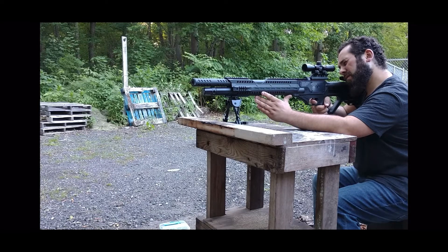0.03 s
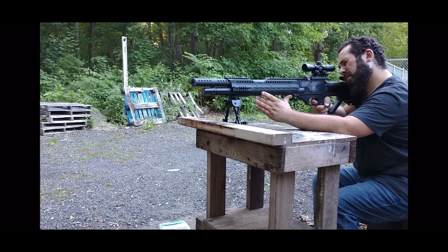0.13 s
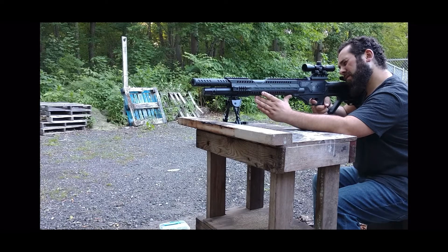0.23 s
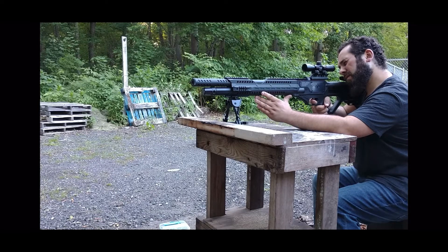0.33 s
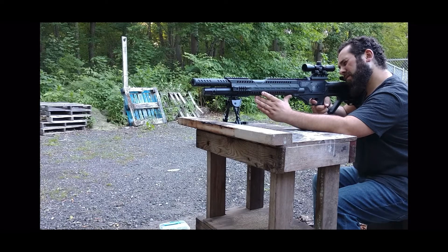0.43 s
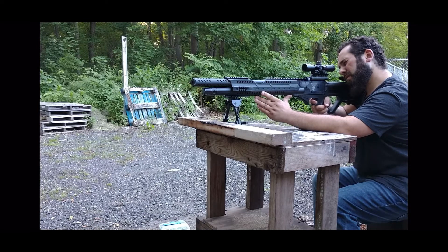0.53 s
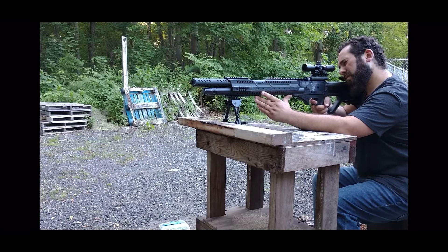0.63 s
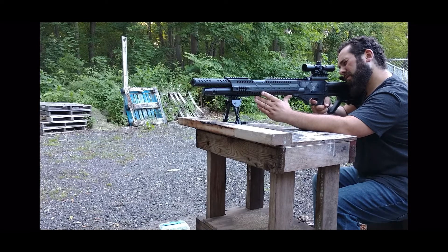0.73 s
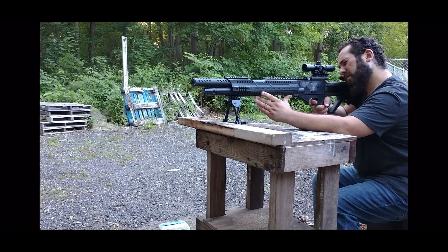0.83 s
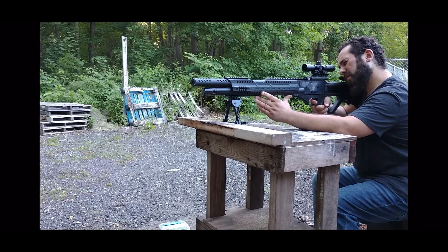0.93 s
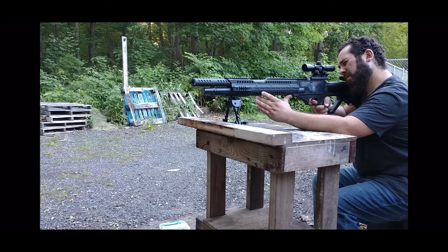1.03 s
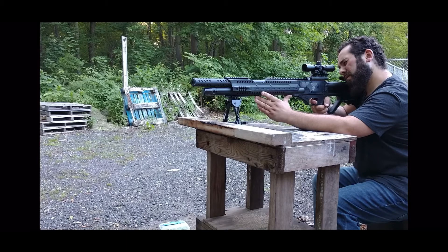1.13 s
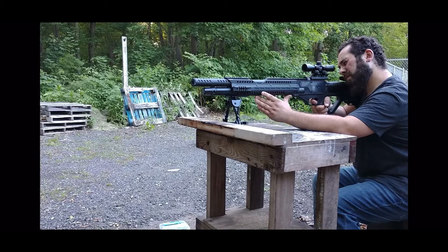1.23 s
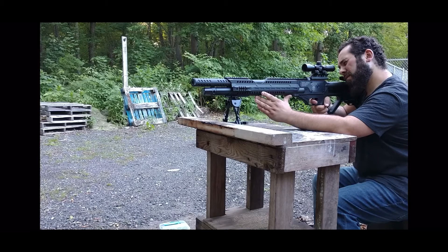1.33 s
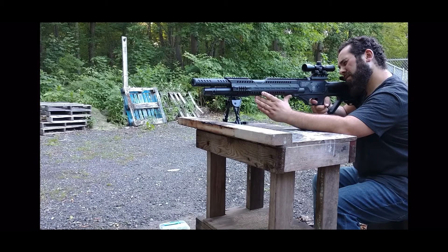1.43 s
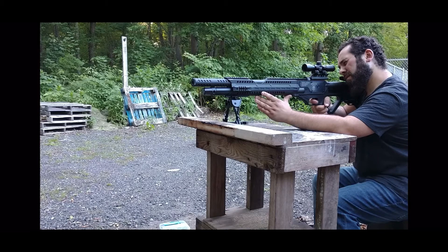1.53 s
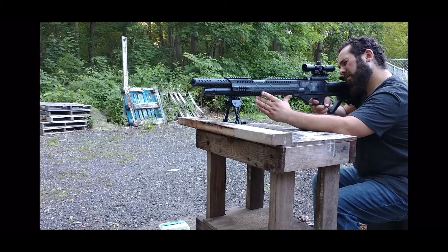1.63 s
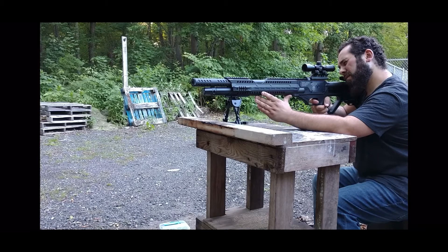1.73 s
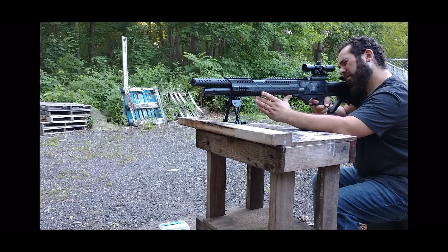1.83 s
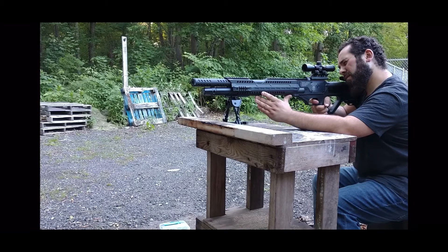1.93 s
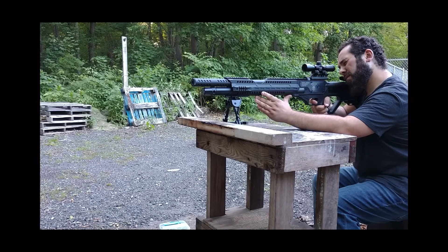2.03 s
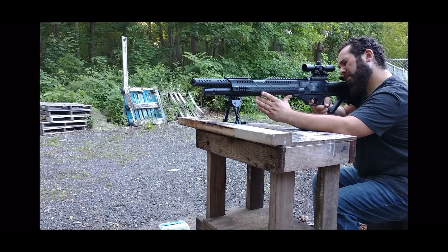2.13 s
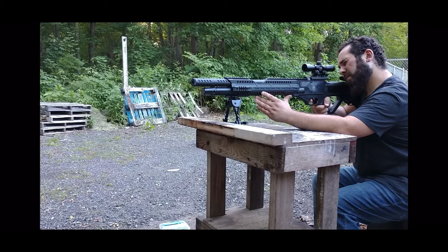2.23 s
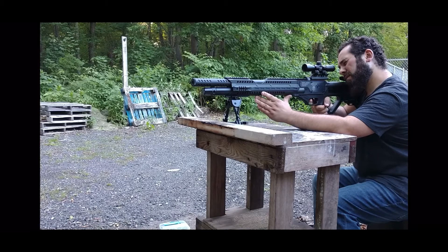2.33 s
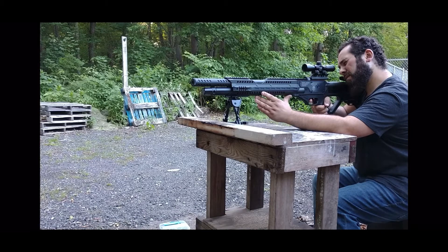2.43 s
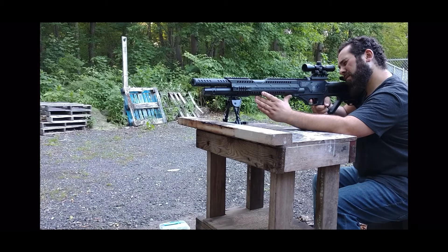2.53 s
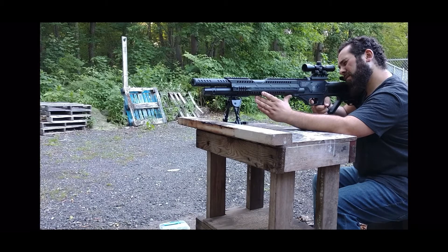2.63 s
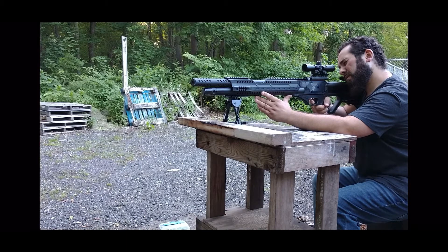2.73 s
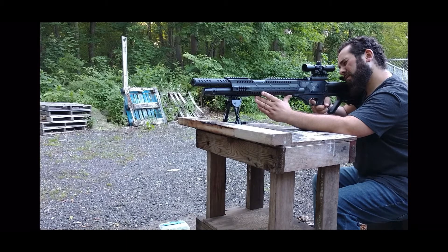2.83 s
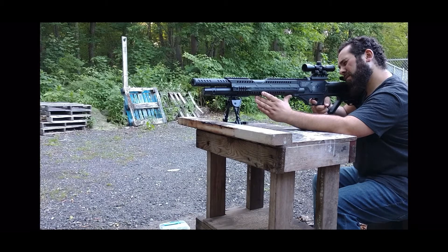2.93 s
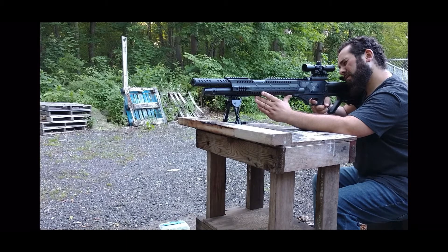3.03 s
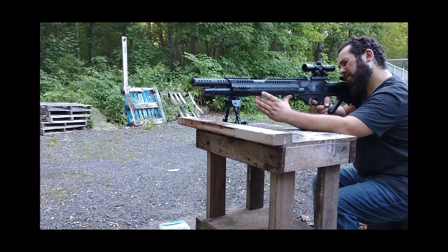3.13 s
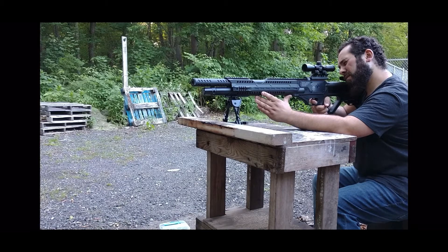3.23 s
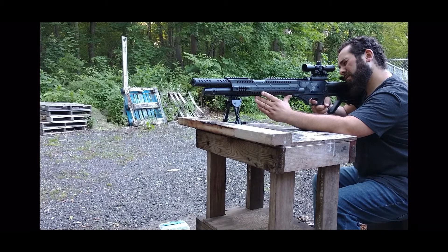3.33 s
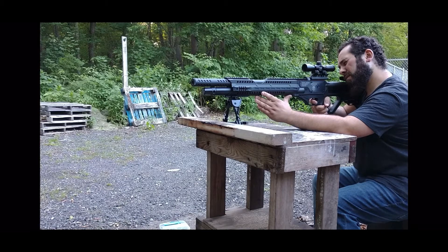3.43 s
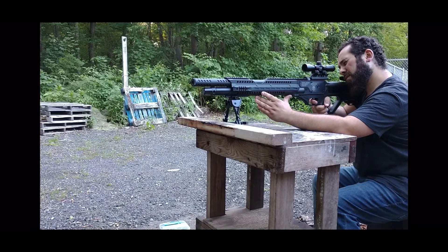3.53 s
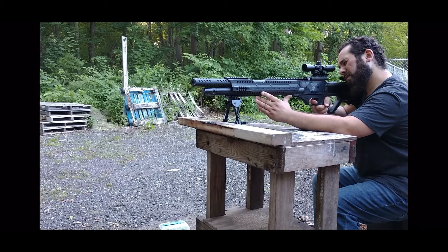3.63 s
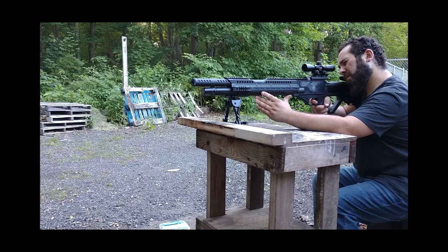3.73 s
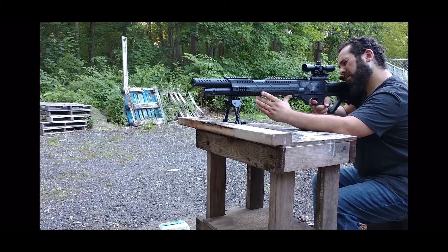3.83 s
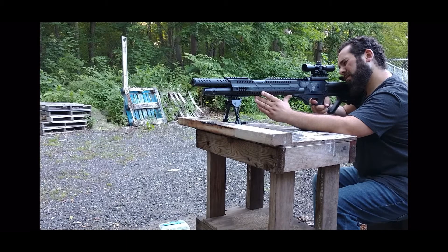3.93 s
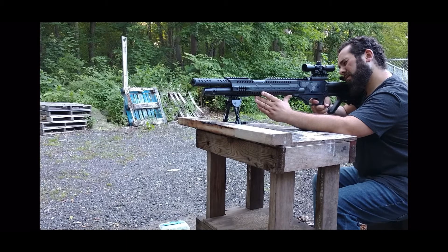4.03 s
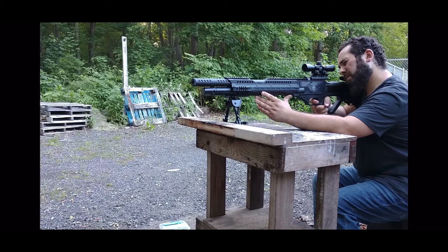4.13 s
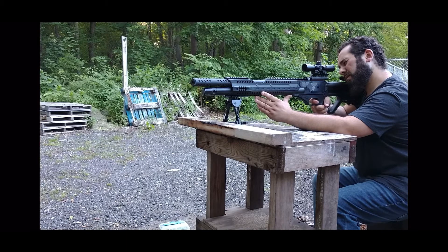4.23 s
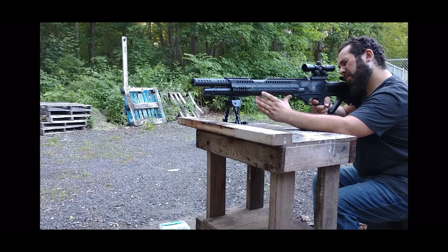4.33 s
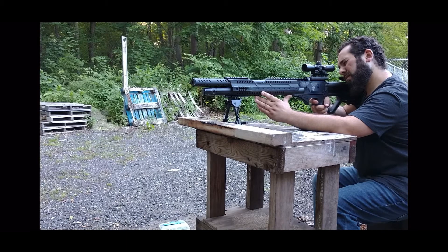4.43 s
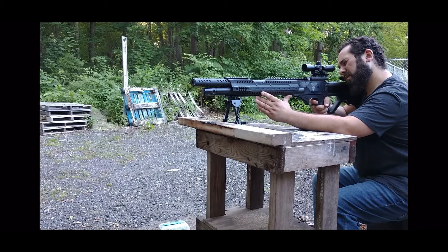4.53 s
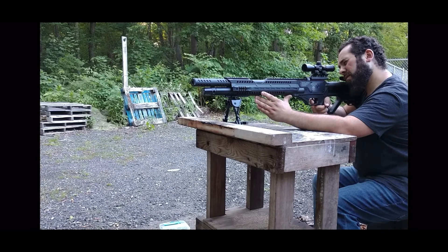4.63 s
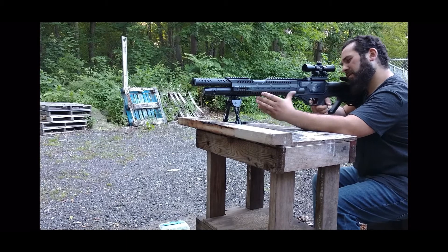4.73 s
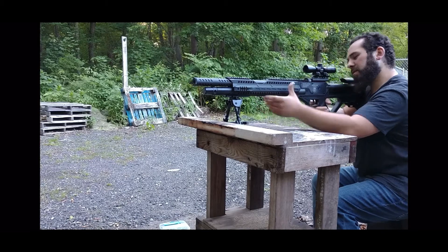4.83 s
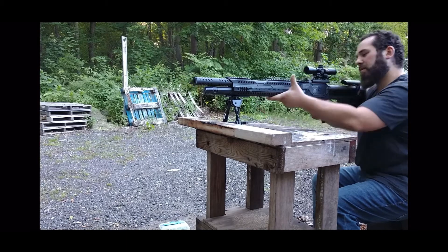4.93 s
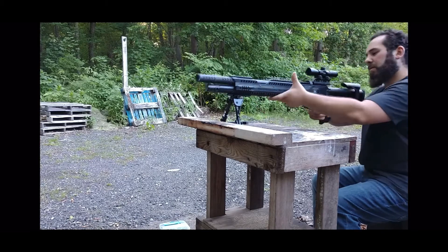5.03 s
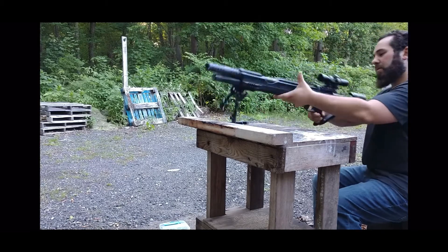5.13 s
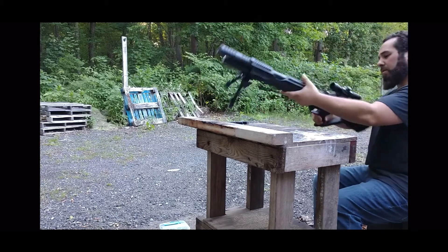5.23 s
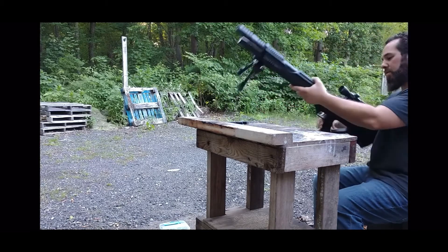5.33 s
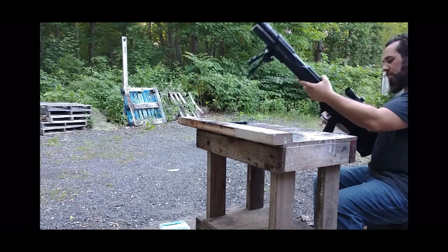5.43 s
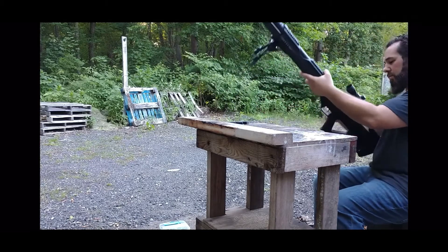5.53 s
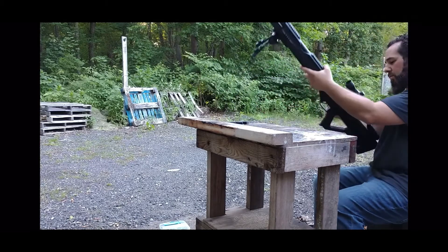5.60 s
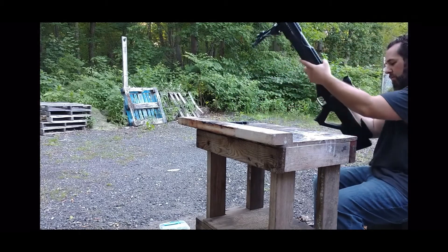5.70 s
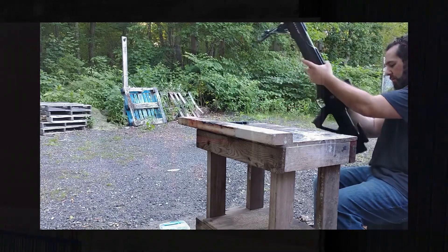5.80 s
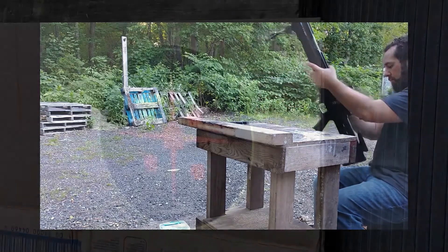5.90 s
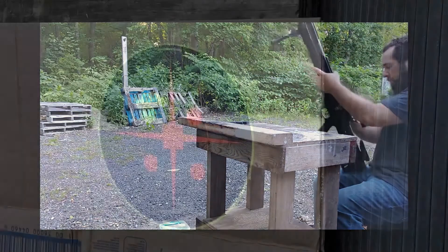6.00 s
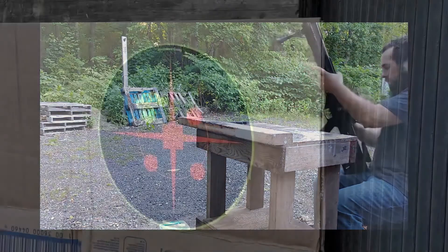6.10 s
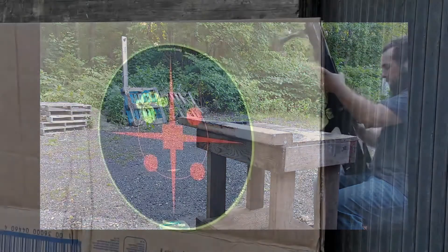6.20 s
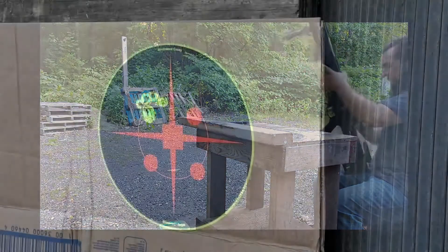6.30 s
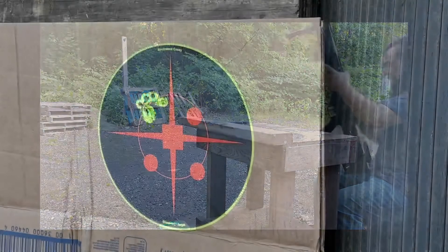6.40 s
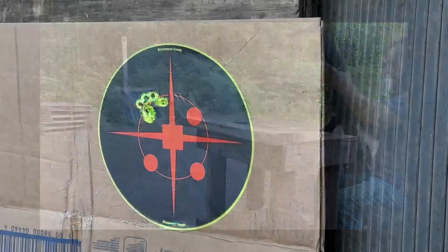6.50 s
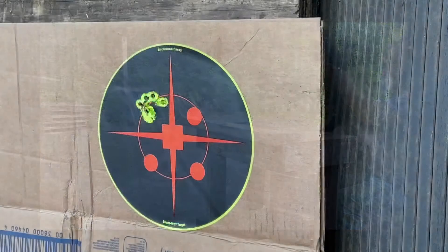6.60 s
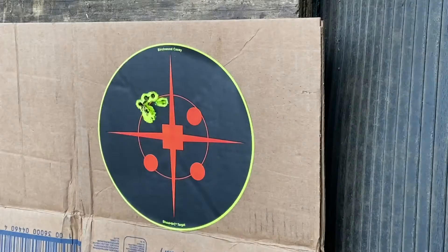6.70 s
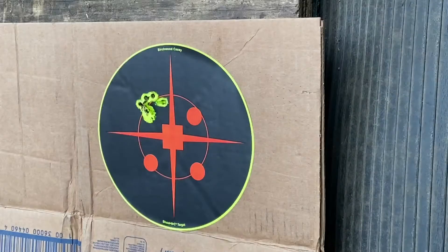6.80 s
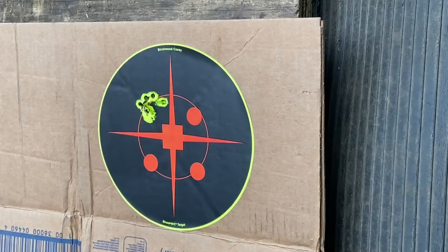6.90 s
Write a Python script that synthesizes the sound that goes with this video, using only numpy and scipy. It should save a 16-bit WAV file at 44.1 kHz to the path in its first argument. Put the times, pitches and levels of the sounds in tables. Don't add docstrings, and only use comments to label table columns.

```python
import sys
import numpy as np
from scipy import signal
from scipy.fft import rfft, irfft, next_fast_len
from scipy.io import wavfile
from scipy.ndimage import uniform_filter1d

SR = 44100
rng = np.random.default_rng(int(sys.argv[2]) if len(sys.argv) > 2 else 0)


def undo_db(level):
    steps = np.asarray(level, float) / 20
    return 10 ** steps


def transcribe(u):
    v = np.clip(np.atleast_2d(u).T, -1, 1)
    q = np.round(v * 32767).astype(np.int16)
    wavfile.write(sys.argv[1], SR, q)


N = 306936
M = next_fast_len(N)
HZ = np.maximum(np.arange(M // 2 + 1) * SR / M, 1)
T = np.arange(N) / SR
PORT_S = .000462
LEAD_S = .015

# blast_s, level_db, wall_echo_delay_s, wall_echo_db
SHOTS = [
    (1.6117, 2, .0423, 3),
    (4.0353, 0.57, .0465, -1.75),
]
# freq_hz, density_db
HISS = [(500, -5.5), (1500, 11.5), (2500, 9), (4000, 2.5), (6500, -2), (8500, -12.5), (11000, -4),
        (15500, -2.5), (16200, -32)]


def shape(table):
    hz, db = np.transpose(table)
    return undo_db(np.interp(np.log(HZ), np.log(hz), db))


def band(x, hz, width_hz):
    edges_hz = np.clip([hz - width_hz / 2, hz + width_hz / 2], 20, .45 * SR)
    y = signal.sosfilt(signal.butter(2, edges_hz, "bandpass", fs=SR, output="sos"), x)
    return y / y.std()


def walk(rate_hz):
    k = int(SR / rate_hz)
    held = rng.standard_normal(size=500)[np.arange(N) // k]
    w = uniform_filter1d(uniform_filter1d(held, k), k)
    return w / w.std()


def arch(progress):
    return np.sqrt(np.sin(np.pi * np.clip(progress, 0, 1)) + 1e-9)


def fall(t, t60):
    return 1000. ** (-t / t60)


def add(out, x, s):
    i = int(s * SR)
    out[:, i:i + x.shape[1]] += x[:, :N - i]


def diffuse(gain):
    mid, side = (rfft(rng.standard_normal(M)) * gain for _ in range(2))
    like = np.sinc(2 * HZ * PORT_S)
    common = np.sqrt((1 + like) / 2) * mid
    opposed = np.sqrt((1 - like) / 2) * side
    pair = irfft(np.array([common + opposed, common - opposed]), M)[:, :N]
    return pair / pair.std()


def fade():
    # start_s, end_s
    cut_s = (6.15, 6.72)
    return np.interp(T, cut_s, [1, 0]) ** 0.95


def gain_db():
    duck_db, hold_s, recover_db_per_s, smooth_s = -25, 0.4, 11.5, .03
    earlier_shot_s = -1.523
    blasts_s = np.array([earlier_shot_s] + [s for s, *_ in SHOTS])
    since_s = T - blasts_s[np.searchsorted(blasts_s, T) - 1]
    climb_db = np.clip(duck_db + recover_db_per_s * (since_s - hold_s), duck_db, 0)
    k = int(smooth_s * SR)
    return uniform_filter1d(climb_db, k, origin=k // 2 - 1)


def next_air():
    # freq_hz, density_db
    air_spectrum = [(25, -8), (70, 4), (150, -20), (300, -24), (800, -25), (2000, -27), (5000, -54),
                    (9000, -76)]
    # start_s, end_s
    fade_in_s = (6.2, 6.7)
    return diffuse(shape(air_spectrum)) * undo_db(-65.5) * np.interp(T, fade_in_s, [0, 1])


def whine():
    # time_s, pitch_hz
    glide = [(4.3, 298), (5.0, 322), (5.6, 333.7), (5.9, 320), (6.2, 300.5), (7.2, 290)]
    level_db, wander_db = -8, 1.5
    s, hz = np.transpose(glide)
    swell = arch((T - s[0]) / (s[-1] - s[0]))
    phase = 2 * np.pi * np.cumsum(np.interp(T, s, hz) * (1 + .012 * walk(12))) / SR
    return swell * undo_db(level_db + wander_db * walk(11)) * np.sin(phase)


def traffic():
    # freq_hz, density_db
    road_spectrum = [(25, -27), (55, -16.5), (100, -1), (200, -7), (350, -4.5), (600, -4), (1000, -7.5),
                     (1500, -14.5), (2200, -21.5), (4000, -43), (9000, -73.5)]
    # start_s, end_s, centre_hz, width_hz, level_db under the traffic
    passing = [(.8, 1.75, 600, 36, -7)]
    out = diffuse(shape(road_spectrum)) * undo_db(0.36 * walk(9.1))
    for start_s, end_s, hz, width_hz, db in passing:
        swell = arch((T - start_s) / (end_s - start_s))
        out = out + undo_db(db) * swell * band(diffuse(1), hz, width_hz)
    return out + whine()


def engine(ride_db):
    # multiple, level_db
    multiples = [(2, 0.5), (3, -4), (4, -9), (6, -12)]
    # time_s, level_db
    load = [(0, -21), (.7, -15), (1.2, -1.5), (2.0, -5.5), (2.4, 3), (3.3, 1.1), (4.0, -0.5), (4.3, -6),
            (4.9, 3), (5.2, 2.5), (5.44, 10.5), (5.8, 0.1), (6.25, -1), (6.4, -7)]
    rate_hz, level_db, throb_db = 46.56, -48.5, 1.5
    lead_rad = .03
    throb_level_db = level_db + ride_db + np.interp(T, *np.transpose(load)) + throb_db * walk(14)
    phase = 2 * np.pi * np.cumsum(rate_hz * (1 + 0.0082 * walk(2.5))) / SR
    tone = sum(undo_db(db + 1.4 * walk(8)) * np.sin(k * phase + np.array([[lead_rad * k], [0]]))
               for k, db in multiples)
    return tone * undo_db(throb_level_db)


def background(ride_db):
    # time_s, level_db
    slow_swell = [(0, 0.3), (1.5, 0.4), (3.9, 1.45), (4.7, 2), (5.44, 2.5), (5.9, -0.5), (6.2, -5), (6.9, -6)]
    traffic_db, leaves_db, circuit_db, flicker_db = -41.5, -60.5, -71, .8
    swelled_db = ride_db + np.interp(T, *np.transpose(slow_swell))
    hiss_gain = np.hypot(undo_db(leaves_db + swelled_db), undo_db(circuit_db)) * undo_db(flicker_db * walk(15))
    hiss = diffuse(shape(HISS)) * hiss_gain
    return (traffic() * undo_db(traffic_db + swelled_db) + engine(ride_db) + hiss) * fade()


def birds():
    # start_s, length_s, level_db at full gain
    whistler = [(1.218, 0.056, -55), (2.833, .1, -53), (3.92, .1, -58.5), (4.833, 0.08, -58),
                (5.818, 0.081, -55), (5.948, .04, -68), (6.841, 0.11, -78.5)]
    chip = [(1.27, 0.028, -54.5), (2.887, .021, -51), (5.88, 0.014, -53.5)]
    lisper = [(0.184, .15, -59.5), (0.774, 0.13, -69), (2.55, .1, -64.5), (6.492, .075, -96.5)]
    piper = [(.105, 0.065, -56.5), (1.537, .08, -70.5)]
    voices = (((4080, 4050, 42), whistler), ((2720, 2650, 150), chip),  # start_hz, end_hz, width_hz
              ((7740, 7620, 130), lisper), ((6090, 6060, 60), piper))
    echo_db, echo_t60_s = -8, .9
    clean = .45
    out = np.zeros((2, N))
    t = np.arange(SR // 2) / SR
    for (start_hz, end_hz, width_hz), notes in voices:
        for start_s, length_s, db in notes:
            note = arch(t / length_s)
            echo = undo_db(echo_db) * fall(t, echo_t60_s) * np.clip(t / length_s, 0, 1)
            waver = band(rng.standard_normal(size=(4, len(t))), width_hz / 2 + 20, width_hz)
            scatter = waver[:2] + 1j * waver[2:]
            hz = np.interp(t, [0, length_s], [start_hz, end_hz])
            tone = np.exp(2j * np.pi * np.cumsum(hz) / SR)
            envelope = clean * note + ((1 - clean) * note + echo) * scatter
            add(out, undo_db(db) * np.real(tone * envelope), start_s)
    return out


def burst(db, hz, width_hz, rise_ms, t60_ms, like, grain_db=4.5):
    ms = np.arange(6000) / SR * 1000
    common, a, b, size = rng.standard_normal(size=(4, len(ms)))
    like = np.clip(like, 0, 1)
    pair = np.sqrt(like) * common + np.sqrt(1 - like) * np.array([a, b])
    pair = pair * undo_db(grain_db * size)
    rise = 1 - np.exp(-(ms / rise_ms) ** 2)
    return band(pair, hz, width_hz) * undo_db(db) * fall(ms, t60_ms) * rise


def strike(thing, db=0):
    rise_ms, like, parts = thing
    return sum(burst(db + part_db, hz, width_hz, rise_ms, t60_ms, like)
               for hz, width_hz, part_db, t60_ms in parts)


def handling():
    # (centre_hz, width_hz, level_db, t60_ms)
    trigger = (0.87, 0.27, [(1210, 1500, -48.5, 30), (4500, 4100, -43.5, 28), (13900, 5000, -57, 28)])
    knock = (2.5, 0.39, [(960, 1680, -35, 47), (4090, 7400, -37, 32.5), (13600, 8000, -46, 31)])
    thud = (1.7, .4, [(900, 490, -43, 29), (4000, 5000, -62, 24)])
    # start_s, level_db
    resets = [
        (2.1161, -1),
        (4.630, 1),
    ]
    # start_s, level_db
    knocks = [
        (5.002, -23),
        (5.629, -29),
        (6.08, 1.2),
    ]
    # start_s, level_db
    thuds = [(6.303, -4)]
    again_s, again_db = 0.0032, -7
    second_clicks = [(s + again_s, db + again_db) for s, db in resets]
    out = np.zeros((2, N))
    for thing, rows in ((trigger, resets + second_clicks), (knock, knocks), (thud, thuds)):
        for s, db in rows:
            add(out, strike(thing, db), s)
    return out


def yard():
    # centre_hz, level_db, t60_s
    reverb = [(298, -53, 0.33), (730, -51.5, 0.91), (1490, -49, 0.65), (3220, -48.5, 0.99),
              (5400, -47.5, 0.83), (8000, -52.5, 0.33), (12550, -46, 0.62)]
    t = np.arange(SR) / SR
    air = diffuse(1)[:, :SR]
    tail = sum(band(air, hz, 0.67 * hz) * undo_db(db) * fall(t, t60_s) for hz, db, t60_s in reverb)
    return tail * (1 - np.exp(-t / .008))


def muzzle_blast(t):
    # freq_hz, level_db, t60_ms
    modes = [(900, -4, 2.6), (2500, -11, 3.0), (3400, -5.5, 3.6), (4500, -8, 3.0), (5700, -9, 2.6),
             (7400, -11, 2.4), (11800, -9, 3.0)]
    lag_s, far_db = .00002, -2
    port_t = np.maximum(t - np.array([[0], [lag_s]]), 0)
    ring = sum(undo_db(db) * fall(port_t, t60_ms / 1000) * np.sin(2 * np.pi * hz * port_t)
               for hz, db, t60_ms in modes)
    ring = signal.sosfilt(signal.butter(2, 270, "highpass", fs=SR, output="sos"), ring)
    return ring * undo_db([[0], [far_db]])


def target_box(t):
    # freq_hz, level_db, t60_s
    modes = [(312, -10.5, 0.12), (539, -1.2, 0.058), (676.5, -8.5, 0.087), (920, -8, 0.045)]
    boom = sum(undo_db(-33 + db) * fall(t, t60_s) * np.sin(2 * np.pi * hz * t) for hz, db, t60_s in modes)
    rise_s = .0015
    return np.tile(boom * (1 - np.exp(-t / rise_s)), (2, 1))


def shot(echo_s, echo_db):
    # (centre_hz, width_hz, level_db, t60_ms)
    sear = (3.7, .7, [(5100, 4000, -27.5, 21)])
    hammer = (.8, .3, [(1360, 3000, -21, 46), (4000, 3400, -15, 16), (12400, 5000, -22.5, 19)])
    jet = (.3, 0.27, [(4500, 7200, -15.5, 8)])
    shroud = (.7, 0.75, [(450, 340, -21, 55), (1090, 1200, -24.5, 60), (4500, 5000, -23.5, 36),
              (12700, 5000, -18, 30)])
    stock = (1.4, .4, [(5100, 6000, -42, 70)])
    bench = (1.7, .6, [(3160, 2200, -33, 46)])
    wall = (.9, .4, [(1000, 1700, -42.5, 63), (5000, 6000, -42.5, 84), (13000, 5000, -46, 61)])
    shed = (2.7, 0.36, [(490, 280, -42, 32)])
    pellet = (.3, 0.13, [(1760, 1940, -44.5, 130), (4860, 5700, -42, 41), (12000, 7000, -45.5, 50)])
    cardboard = (1.2, 0.66, [(715, 560, -43, 66), (320, 166, -47, 103)])
    # freq_hz, level_db, t60_ms, delay_s
    pressure_swing = (118, -31.5, 55, .0052)
    sequence = [(-.0100, sear), (-.0073, hammer), (-.0004, jet), (.0011, shroud),
                (.0058, stock), (.016, bench), (.092, shed), (.1179, pellet), (.1245, cardboard)]
    t = np.arange(SR // 2) / SR
    out = np.zeros((2, SR))
    for s, thing in sequence:
        add(out, strike(thing), LEAD_S + s)
    add(out, strike(wall, echo_db), LEAD_S + echo_s)
    add(out, muzzle_blast(t), LEAD_S)
    hz, db, t60_ms, delay_s = pressure_swing
    swing = undo_db(db) * fall(t, t60_ms / 1000) * np.sin(2 * np.pi * hz * t)
    add(out, swing * np.array([[1], [-1]]), LEAD_S + delay_s)
    add(out, target_box(t), LEAD_S + .1195)
    return out


def scene():
    ride_db = gain_db()
    out = background(ride_db) + next_air() + birds() * undo_db(ride_db) + handling()
    for s, db, *echo in SHOTS:
        add(out, yard() * undo_db(db), s)
        add(out, shot(*echo) * undo_db(db), s - LEAD_S)
    return out


def low_pass(x):
    return signal.sosfilt(signal.butter(12, 16970, fs=SR, output="sos"), x)


def record(dry):
    # freq_hz, level_db
    right_colour = [(60, -4), (200, -4), (700, -3), (1500, 0), (9500, 1.5), (12000, -13.5), (16000, -16.5)]
    beam = .9
    notch_hz, notch_width_hz, notch_db = 9560, 240, -19.5
    top_hz, clip_level, self_db = 15950, .96, -79
    a, b = rfft(dry, M)
    late = beam * np.exp(-2j * np.pi * HZ * PORT_S)
    makeup = (1 + beam ** 2 - 2 * np.sinc(2 * HZ * PORT_S) * late.real) ** -.5
    colour = makeup * undo_db(notch_db / (1 + ((HZ - notch_hz) / notch_width_hz) ** 2))
    colour = colour / np.sqrt(1 + (HZ / top_hz) ** 240)
    left, right = a - late * b, (b - late * a) * shape(right_colour)
    beams = irfft(np.array([left, right]) * colour, M)[:, :N]
    own = irfft(rfft(rng.standard_normal((2, M))) * shape(HISS) * colour / makeup, M)[:, :N]
    beams = beams + undo_db(self_db) * own / own.std() * fade()
    mix = np.clip(beams, -clip_level, clip_level)
    return low_pass(mix)


dry = scene()
out = record(dry)
transcribe(out)
```